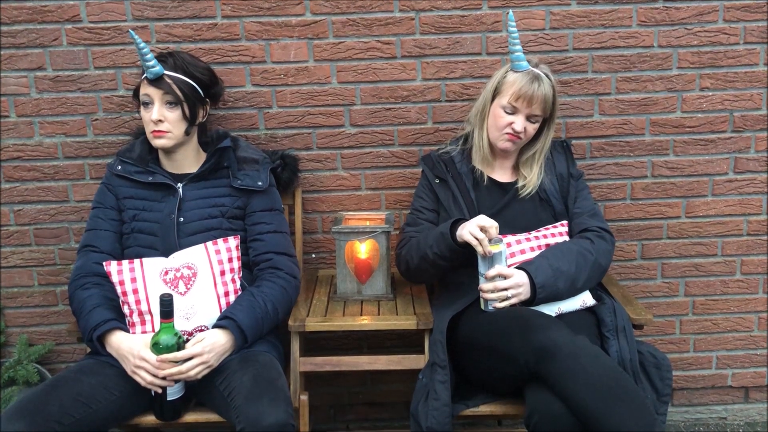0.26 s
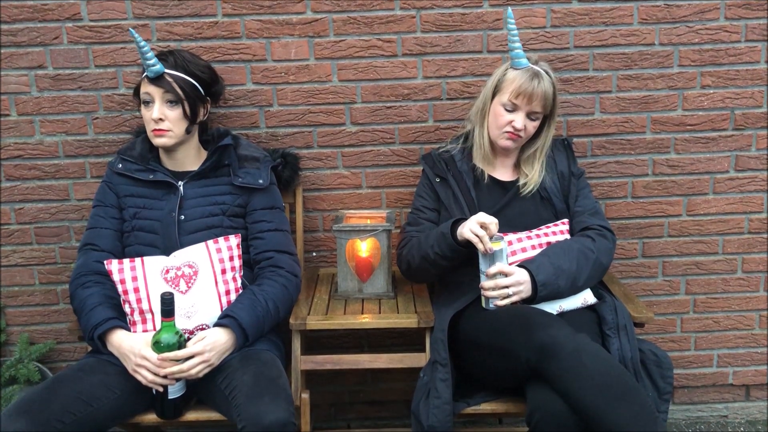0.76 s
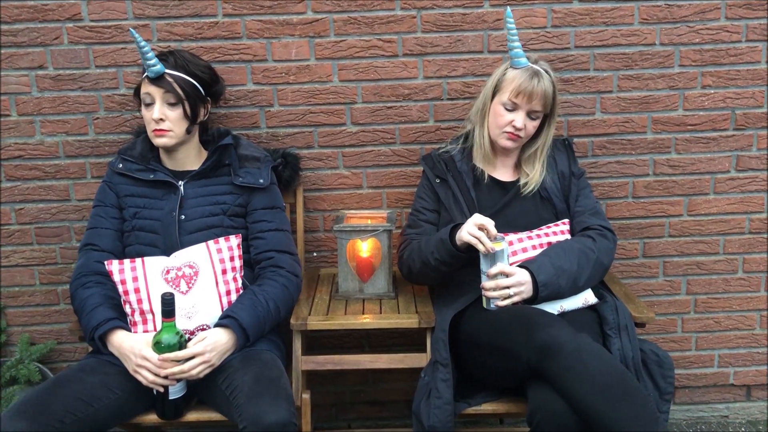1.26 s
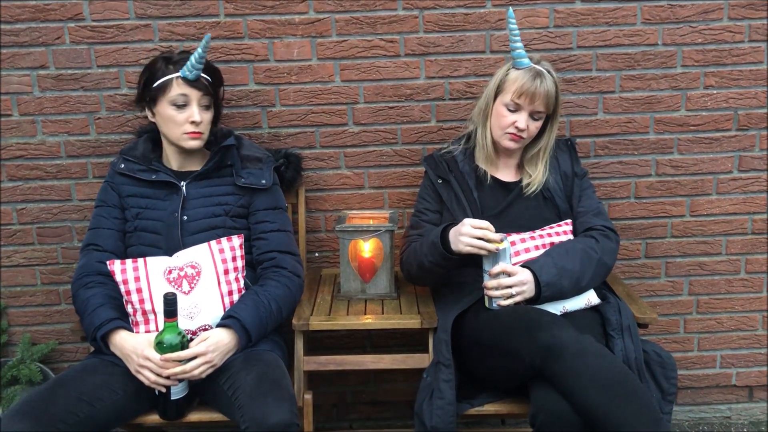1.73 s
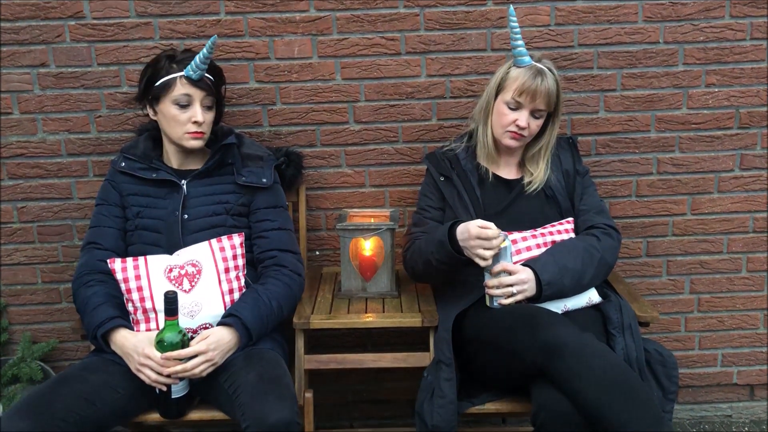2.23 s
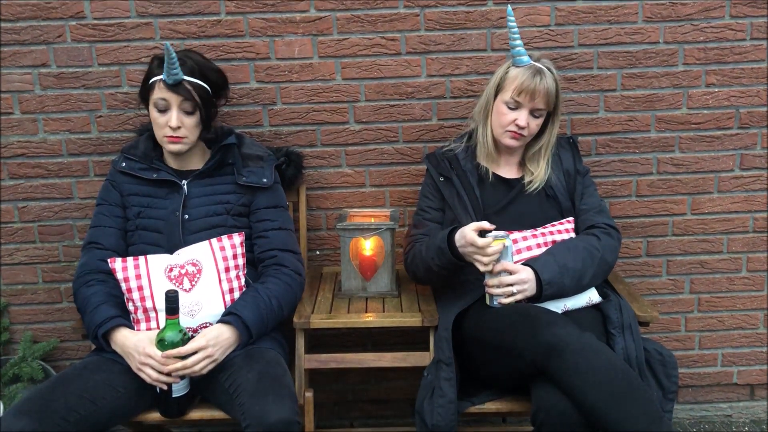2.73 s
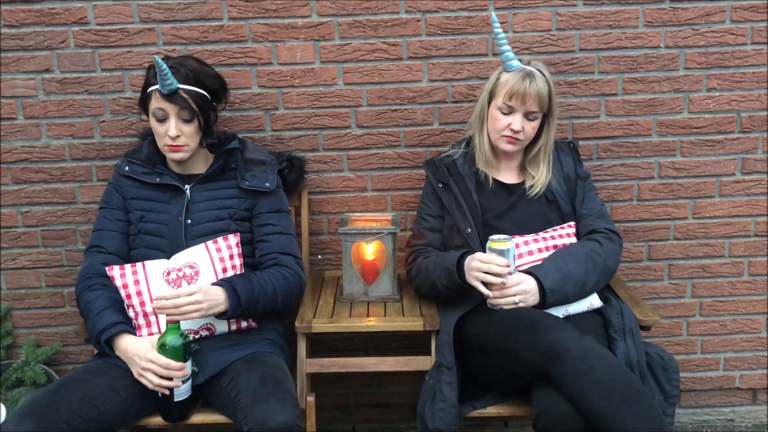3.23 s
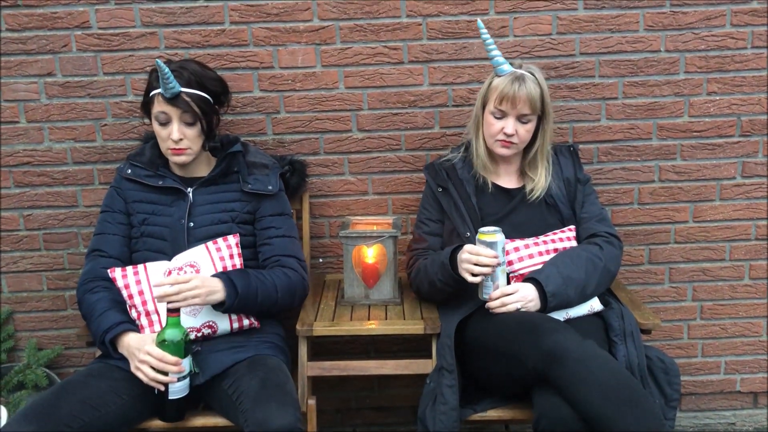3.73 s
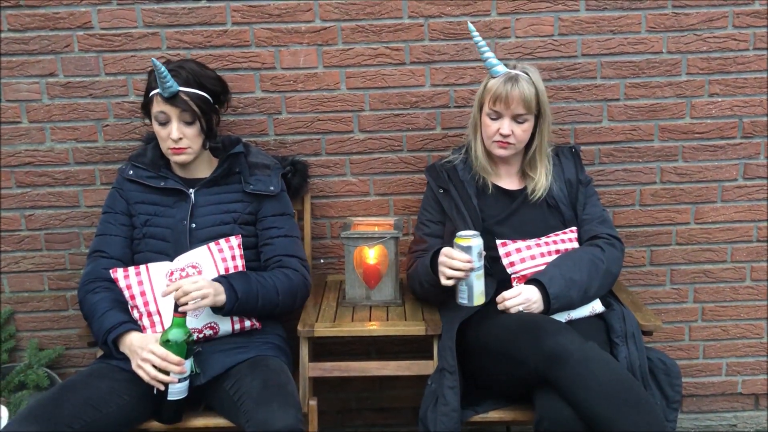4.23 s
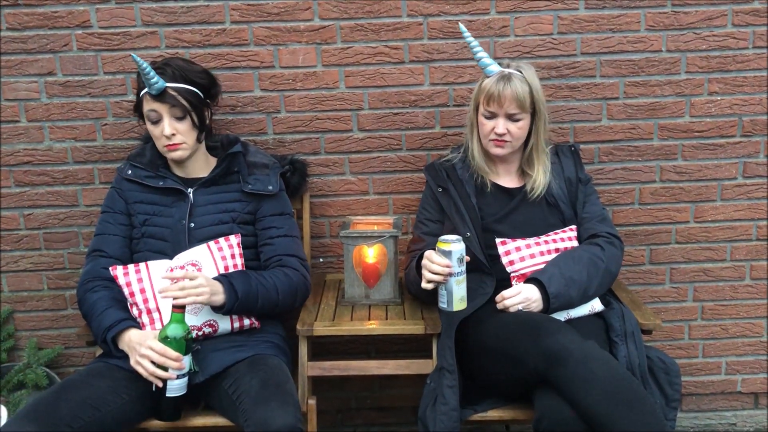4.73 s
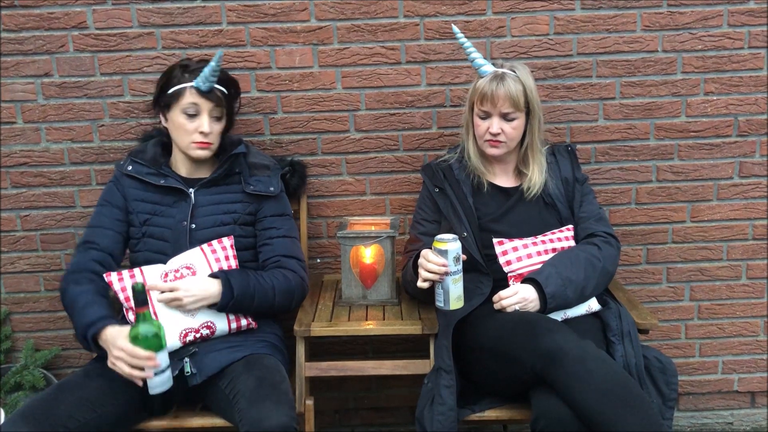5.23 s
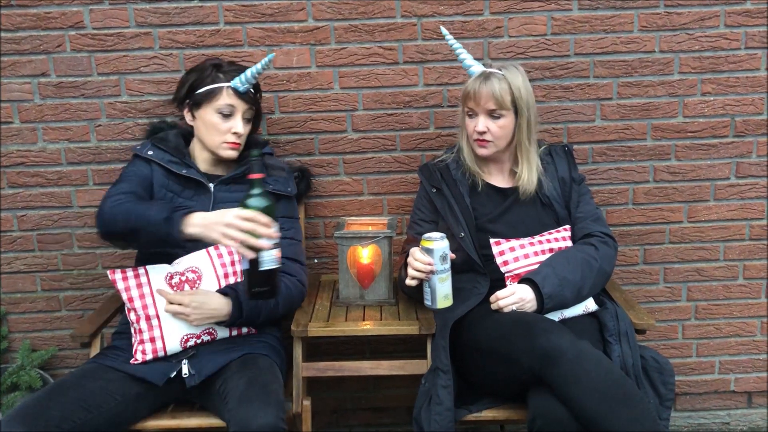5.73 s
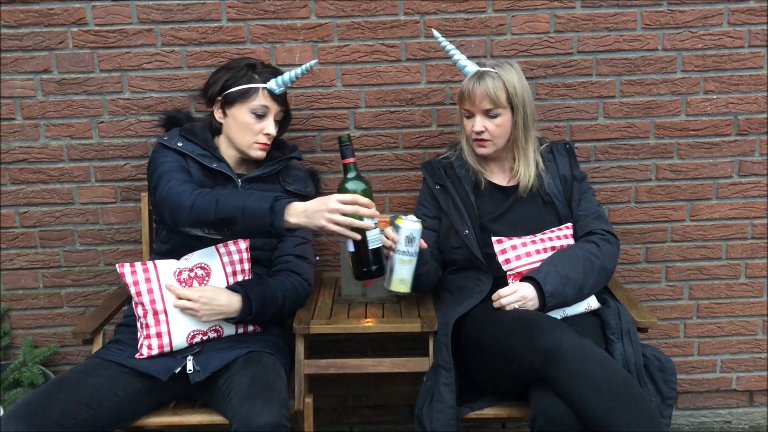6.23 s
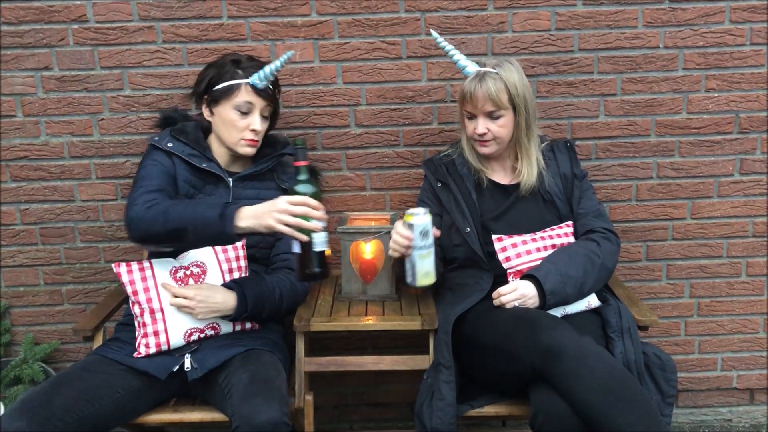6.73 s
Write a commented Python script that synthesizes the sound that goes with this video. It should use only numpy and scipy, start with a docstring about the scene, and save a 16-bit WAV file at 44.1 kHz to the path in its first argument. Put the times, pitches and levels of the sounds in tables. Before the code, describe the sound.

A quiet brick-walled yard, heard from a few metres, with faint low town rumble throughout and a short close wall echo. Almost at once, at 0.04 s, a can's seal cracks sharply; gas hisses and whistles, the lever snaps at 0.1, and the lid tears at 0.26-0.31 with a loud crisp burst of foamy spray. Hollow tinny tab ticks follow from 0.47 to 1.27, strongest around 1.0-1.1. Near-quiet, then a brief jacket swish at 2.06 and one thin tick at 2.41. Nylon rustles around 3.05-3.3. From 3.43 a metal screw cap scrapes and clicks, densest until 4.0, sparser until 4.84. At 4.88 a clear glass knock starts a soft low bottle hum. Small knocks and a short bubbling slosh come at 5.2-5.3. Jackets swish toward 6.3, a faint fingertip tap falls at 6.09, and the can touches the bottle in several dull clinks at 6.41-6.52; rustling closes near 7.

```python
"""Can and bottle opened in a yard

Brick-walled yard, one microphone a few metres off. A ring-pull can opens: noise whistles in the vented seal,
millisecond grains spray as foam, and short noise bursts ring the lid and tab through resonances.
Then a screw cap scrapes and ticks off a glass bottle, the neck is knocked and hums, bubbles glide in the drink,
the can touches the bottle. Padded jackets rustle as banded noise; a distant town rumbles as shaped noise."""
import sys
import numpy as np
from scipy import signal
from scipy.fft import rfft, irfft
from scipy.io import wavfile

SR = 44100
rng = np.random.default_rng(int(sys.argv[2]) if len(sys.argv) > 2 else 0)


def dump_mix(stems):
    """Bounce the given channels to the path in sys.argv[1] as a 16-bit WAV at rate SR."""
    frames = np.atleast_2d(stems).T  # one column per channel
    limited = np.clip(frames, -1, 1)  # hard clip at full scale
    pcm = np.round(limited * 32767).astype(np.int16)
    wavfile.write(sys.argv[1], SR, pcm)


def field_ratio(decibels):
    """Amplitude ratio for a level in dB (20 dB per decade); scalars and array-likes work."""
    return 10 ** (np.asarray(decibels, dtype=float) / 20)


N = 307818
T = np.arange(N) / SR

# MODES are resonances over a flat path: (frequency [Hz], width [Hz], level [dB])
# SWELLS are envelopes: (peak time [s], level [dB], rise [ms per 13 dB], fall [ms per 13 dB])
# STRIKES are contacts: (time [s], relative level [dB], low-end tilt [dB], added ring of the modes [dB])

# distant town, spectrum of the rumble: (frequency [Hz], relative level [dB])
TOWN_SPECTRUM = [(15, -45), (25, -13), (43, -17.5), (102, -3), (123, -11), (149, -1.5), (212, -4.5),
                 (285, -10.5), (344, -10.5), (659, -18.5), (796, -19), (1440, -29), (1740, -30),
                 (9070, -40), (16000, -47)]
# drones in the rumble: (centre [Hz], width [Hz], level [dB])
TOWN_DRONES = [(55, 6.6, -71), (103, 11, -72), (146.5, 10, -74.5), (238, 82, -66)]
TOWN_RUMBLE_DB = -63

# jacket movements: (peak time [s], nylon level [dB], rise [ms per 13 dB], fall [ms per 13 dB],
# padding level over nylon [dB])
JACKET_MOVES = [(2.059, -66, 11, 16, -5), (3.05, -67, 224, 190, -7), (3.33, -71.5, 42, 87, -6),
                (3.6, -81, 360, 800, 5.5), (5.1, -72, 170, 130, -7.5), (5.3, -79.5, 91, 400, 3),
                (5.9, -86, 400, 210, 12), (6.3, -69, 610, 200, 0), (6.98, -73.5, 280, 100, 5)]
NYLON_REST_DB, PADDING_REST_DB = -83.5, -88.5

# yard: tail energy against the direct sound, decay times of lows and treble, wall echo delay and levels
YARD_DB, YARD_T60_S, YARD_TOP_T60_S = -14.5, 0.22, 0.041
WALL_MS, CAN_WALL_DB, BOTTLE_WALL_DB = 3.3, -10.5, -14

# air in the bottle: onset, final pitch, level, decay time
NECK_S, NECK_HZ, NECK_DB, NECK_T60_S = 4.884, 146, -42, 0.9
# drink moving in the bottle: SWELLS columns, (peak time [s], relative level [dB], rise, fall [ms per 13 dB])
SLOP_SWELLS = [(5.21, -60, 12, 108), (5.289, -59, 45, 40.4)]
# low thuds under the knocks and touches: SWELLS columns
LOW_THUDS = [(4.883, -52.5, 2.3, 14), (5.207, -53, 1.5, 53), (6.42, -57.5, 2.7, 65)]
# screw cap: MODES columns
CAP_MODES = [(1970, 290, 6.5), (2580, 190, 6.5), (3120, 290, 5.5), (3395, 127, 15.5), (4200, 130, -27),
             (5320, 420, -10)]
# screw cap clicking round: STRIKES columns
CAP_TICKS = [(3.4317, -38.5, -10, -13), (3.445, -45, 17, -3), (3.4977, -49, -2, -4), (3.5066, -37.5, 3, 11),
             (3.5594, -35.5, 1.5, 8.5), (3.6606, -52, -8, -3), (3.7017, -45, 17, -16),
             (3.7594, -46, 13, -12), (3.864, -55, -20, 9), (3.894, -54, -10, 5), (3.928, -44, 12, 1),
             (3.9894, -48.5, 14, -10), (4.241, -60, -7, -8), (4.3615, -51.5, -11, 4), (4.4, -48, 0, -7),
             (4.4778, -50, 0, 3), (4.5116, -44.5, -4, -9), (4.6518, -52, 10, -6), (4.8434, -55, 11, -13)]
# scraping of the thread: SWELLS columns
THREAD_SWELLS = [(3.45, -56.5, 22, 35), (3.56, -57.5, 39, 30), (3.71, -55, 34, 71),
                 (3.945, -66.5, 44, 45.7), (4.25, -65.5, 11, 30), (4.37, -79, 58, 70),
                 (4.53, -71.5, 120, 22.14), (4.65, -80, 46, 25.2)]
# glass of the bottle: MODES columns
GLASS_MODES = [(620, 60, 6), (1130, 30, 10), (1335, 8, 27), (1550, 50, 11), (1900, 90, 8), (2500, 30, 14),
               (2622, 16, 21), (2960, 22, 15), (3397, 41, 13), (3747, 25, 14), (5400, 30, 13),
               (5534, 22, 22), (5631, 35, 13), (6780, 40, 17)]
# knocks on the glass: STRIKES columns
GLASS_KNOCKS = [(4.880, -29.5, 3, 1), (5.206, -47, 6.5, -21), (5.216, -44, 6.9, -2), (5.225, -44, 3.3, -12)]
# a fingertip shifting on the bottle: STRIKES columns
FINGER_TAP = [(6.089, -45, -11, 2.5)]
# can meeting bottle: STRIKES columns
CAN_TOUCHES = [(6.414, -37, 1.6, 3), (6.442, -45, 4.2, 2.1), (6.492, -47, 1.7, 5), (6.52, -48.5, 4.8, 6)]
# the can held in a fist: MODES columns
GRIPPED_MODES = [(1614, 250, 8.5), (1990, 250, 6), (3200, 500, 4), (6900, 700, 0)]

# shell and lid of the can: MODES columns
CAN_MODES = [(1750, 90, 5), (2150, 140, 12), (3850, 320, 11), (4450, 250, 4), (6900, 500, 6),
             (7900, 300, 2), (9900, 500, 5), (13000, 600, 2)]
# the lid while still under pressure: MODES columns
TIGHT_LID_MODES = [(3100, 45, 17), (4400, 45, 17), (5700, 50, 15), (6250, 50, 13), (6900, 60, 13),
                   (7600, 60, 13), (9500, 70, 14), (10000, 70, 14), (10750, 70, 11), (13500, 80, 10)]
# pushed-in flap of the lid, one mode: (frequency [Hz], width [Hz], level [dB])
FLAP_MODE = (1370, 40, 18.3)
# air above the drink, higher as the opening grows, muffled once the can is gripped:
# (time [s], frequency [Hz], width [Hz], level [dB])
HEADSPACE = [(.27, 700, 150, -15), (.28, 763.7, 195, 15), (0.398, 833.7, 200, 10), (.47, 1077, 60.2, 25),
             (1.1, 1100, 69.7, 25), (2.4, 1204, 300, 1)]
OPEN_S = 0.45  # from here the flap rings too
# puffs through the split seal: SWELLS columns
GAS_PUFFS = [(.068, -31.5, 16, 40), (.1, -27.5, 45, 11), (.15, -62.5, 20, 60), (.2635, -30.5, .6, 39),
             (.3, -33.5, 18, 14)]
# whistles of the slit: MODES columns
VENT_MODES = [(6600, 350, 3), (8800, 320, 8.5), (9700, 390, 4), (9730, 51, 4.5), (9300, 230, 5),
              (13450, 230, 13)]
VENT_SHUT_S = 0.118
# spray under the sealed lid: SWELLS columns
FOAM_SHUT = [(.108, -41.5, 30, 20), (.16, -64, 20, 60)]
# foam through the torn lid: SWELLS columns
FOAM_TORN = [(0.2622, -29, 0.68, 9.5), (0.295, -26.5, 12, 20), (0.329, -41, 25, 69)]
# the seal cracking: STRIKES columns
SEAL_CRACK = [(0.0435, -12.5, -20.5, 12.)]
# the lever snapping down on the lid: STRIKES columns
TAB_PRESS = [(0.1002, -10.5, -8, 13)]
# the score line of the lid tearing: STRIKES columns
LID_TEARS = [(0.2613, -13.5, 1, -2), (0.2813, -7, 1.5, 2), (0.2838, -8.5, -6.5, -4.5),
             (0.2924, -26.5, -12.5, -8), (0.2994, -14, -12, 13), (0.3064, -14, -16.5, -8)]
# the tab ticking on the lid: STRIKES columns
TAB_TICKS = [(0.4688, -28.5, 2, 3), (0.5062, -39, 6, -1), (0.5302, -41, 4, -12), (0.5424, -38, 12, -1),
             (0.5716, -46.5, 0, -8), (0.6504, -42.5, -2, 2), (0.6744, -46.5, 14, 3), (0.7447, -49.5, 13, 6),
             (0.8006, -49.5, 2, -13), (0.8097, -44, -3, 11), (0.8255, -48.5, -15, 7), (0.851, -50, -4, -7),
             (0.8779, -45.5, -8, 2), (0.8974, -38.5, -5, -9), (0.9672, -32, -8, -6), (1.0031, -30.5, -1, 3),
             (1.0364, -38.5, 3, 4), (1.0465, -28.5, -17, -2), (1.0984, -28.5, -11, 15),
             (1.271, -45.5, 8.5, -19), (2.4089, -30, 7.5, -40)]
# loose tab shivering on the lid: SWELLS columns
TAB_RATTLE = [(.47, -52.5, 2.8, 14), (.5, -55.5, 52, 70), (.652, -62.5, 2.5, 22), (.802, -78, 2.8, 49),
              (.9, -81, 30, 15), (1.005, -62, 2.7, 28), (1.05, -60, 7.1, 28), (1.098, -47, 2.2, 11),
              (2.412, -56.5, 2.2, 29)]

# contacts: (decay [ms], treble tilt [dB], scatter of the modes [dB],
# treble lost for each dB softer than FIRM_DB [dB])
FIRM_DB = -30
TEAR, TICK = (0.1, -7.5, 3.5, 0.1), (1.9, 2.2, 7.5, 0.14)
SEAL, PRESS = (0.9, -1, 1, 0.01), (1.75, -30, 4.5, 0.01)
RATCHET, KNOCK = (2.2, -3, 4, 0.26), (4.5, -1.5, 2, 0.8)
TOUCH, TAP = (16, -3, 7.5, 0.4), (0.5, -40, 2, 0.01)

OVERLOAD = 0.9  # microphone ceiling, full scale = 1


def level(x, db=0):
    """Set the rms."""
    return x * field_ratio(db) / np.sqrt(np.mean(x ** 2))


def ringing(hz, modes):
    """Response of a body: a flat path plus its resonances."""
    return 1 + sum(field_ratio(db) / (1 + 2j * (hz - f) / w) for f, w, db in modes)


def shaped(x, response):
    """Filter x by a function of frequency; rms 1."""
    hz = np.fft.rfftfreq(len(x), 1 / SR)
    return level(irfft(rfft(x) * response(hz), len(x)))


def band(x, lo_hz, hi_hz):
    """Band-pass; rms 1."""
    sos = signal.butter(3, [lo_hz, min(hi_hz, SR / 2.1)], "band", fs=SR, output="sos")
    return level(signal.sosfilt(sos, x))


def gain(swells):
    """Sum of swells that rise and fall evenly in dB around their peaks."""
    total = np.zeros(N)
    for s, db, rise_ms, fall_ms in swells:
        away = np.where(T < s, (s - T) / max(rise_ms, 0.1), (T - s) / max(fall_ms, 0.1))
        total += field_ratio(db - 12970.0 * away)
    return total


def grit(spread_db, share):
    """Noise in millisecond grains, a share of them louder."""
    size = SR // 1000
    count = N // size + 1
    boost_db = spread_db * np.minimum(rng.exponential(size=count), 3)
    boost_db = boost_db * (rng.random(count) < share)
    return rng.standard_normal(N) * np.repeat(field_ratio(boost_db), size)[:N]


def strikes(events, modes, contact):
    """Each contact is a dying burst plus a blow that rings the body; every blow finds the modes differently."""
    size, lead = 16384, 64  # samples: length of a hit, room before it
    decay_ms, edge_db, scatter_db, dulling = contact
    out = np.zeros(N + size)
    t = (np.arange(size) - lead) / SR
    hz = np.fft.rfftfreq(size, 1 / SR)
    corners_hz = [120, 350, 1000, 4200, 8500, 16000]
    for s, strength_db, low_db, ring_db in events:
        fade = np.where(t > 0, t / decay_ms, -t / max(decay_ms / 4, 0.25))
        burst = rng.standard_normal(size) * np.exp(-1000 * fade)
        blow = rfft(burst * np.exp(-1000 * np.abs(t) / decay_ms))
        blow = blow / np.abs(blow)  # even at all pitches, spread over the contact
        struck = np.array(modes(s), float)
        struck[:, 2] += ring_db + scatter_db * rng.standard_normal(len(struck))
        struck[:, 0] *= 1 + 0.003 * scatter_db * rng.standard_normal(len(struck))
        # softer contacts are duller
        high_db = edge_db - dulling * max(FIRM_DB - strength_db, 0)
        tilt_db = [low_db - 64, low_db - 35.5, low_db - 0.5, 0, high_db + 4, high_db - 2.0]
        tilt = field_ratio(np.interp(np.log(hz + 1), np.log(corners_hz), tilt_db))
        creak = rfft(burst) / np.linalg.norm(burst)
        rung = blow * (ringing(hz, struck) - 0.7)
        hit = irfft(tilt * (creak + rung))
        hit = hit * np.clip(3 - t / 0.08, 0, 1)  # rung out after a quarter second
        start = int((s + 0.00065) * SR) - lead
        out[start:start + size] += hit * field_ratio(strength_db + 12.0) / np.linalg.norm(hit)
    return out[:N]


def town():
    """Distant broad rumble with a few wavering drones, each a narrow band of noise."""
    hz, db = np.transpose(TOWN_SPECTRUM)
    rumble = shaped(rng.standard_normal(N), lambda f: field_ratio(np.interp(np.log(f + 1), np.log(hz), db)))
    out = field_ratio(TOWN_RUMBLE_DB) * rumble
    for centre, width, drone_db in TOWN_DRONES:
        drone = shaped(rng.standard_normal(N), lambda f: 1 / (1 + ((f - centre) / width * 2) ** 2))
        out += field_ratio(drone_db) * drone
    return out


def jackets():
    """Smooth nylon swish with a duller part from the padding."""
    nylon_gain = field_ratio(NYLON_REST_DB) + gain([row[:4] for row in JACKET_MOVES])
    padding_moves = [(s, db + low, rise, fall) for s, db, rise, fall, low in JACKET_MOVES]
    padding_gain = field_ratio(PADDING_REST_DB) + gain(padding_moves)
    nylon = band(grit(0.99, 0.25), 2200, 14000)
    padding = band(rng.standard_normal(N), 270, 2200)
    return nylon * nylon_gain + padding * padding_gain


def yard(x, wall_db):
    """One close echo off the wall behind, then a short diffuse tail that loses its treble first."""
    t = np.arange(SR // 2) / SR
    noise = rng.standard_normal(len(t))
    low = signal.sosfilt(signal.butter(1, 5000, fs=SR, output="sos"), noise)
    tail = low * field_ratio(-60 * t / YARD_T60_S) + (noise - low) * field_ratio(-60 * t / YARD_TOP_T60_S)
    tail = tail * (1 - np.exp(-t / 0.012))
    response = field_ratio(YARD_DB) * tail / np.sqrt(np.sum(tail ** 2))
    response[0] += 1  # direct sound
    response[int(WALL_MS * SR / 1000)] += field_ratio(wall_db)
    return signal.fftconvolve(x, response)[:N]


def neck():
    """The air in the opened bottle hums; the tone rises as the cap clears the mouth."""
    t = np.clip(T - NECK_S, 0, None)
    phase = 2 * np.pi * NECK_HZ * (t - 0.15 * 0.028 * (1 - np.exp(-t / 0.013)))
    return field_ratio(NECK_DB - 60 * t / NECK_T60_S) * (1 - np.exp(-t / 0.01)) * np.sin(phase)


def slop(count=120):
    """Bubbles that glide upward, higher-pitched ones later, over splash noise."""
    start, end = SLOP_SWELLS[0][0] - 0.03, SLOP_SWELLS[-1][0] + 0.12
    bubbles, t = np.zeros(N), np.arange(2048) / SR
    for when, pitch, softness in rng.random((count, 3)):
        hz = 450 * np.exp(1.21 * when + 1.3 * pitch)
        tone = np.sin(2 * np.pi * hz * t * (1 + 8 * t))
        k = int((start + when * (end - start)) * SR)
        bubbles[k:k + len(t)] += field_ratio(-12 * softness) * np.exp(-t * hz / 6) * tone
    bubbles = bubbles / np.std(bubbles[int(start * SR):int(end * SR)])
    splash = band(grit(3.3, 0.31), 360, 5000)
    return (bubbles + 0.61 * splash) * gain(SLOP_SWELLS) * field_ratio(1)


def cap():
    """The thread scrapes as gritty noise and the cap clicks, both ringing the cap."""
    scrape = band(grit(4.0, 0.2), 490, 7900)
    thread = shaped(scrape, lambda hz: ringing(hz, CAP_MODES)) * gain(THREAD_SWELLS)
    return thread + strikes(CAP_TICKS, lambda s: CAP_MODES, RATCHET)


def glass():
    """Knocks and a fingertip ring the glass modes."""
    knocks = strikes(GLASS_KNOCKS, lambda s: GLASS_MODES, KNOCK)
    return knocks + strikes(FINGER_TAP, lambda s: GLASS_MODES, TAP)


def low_thuds():
    """Low thuds under the knocks and touches: swells of low-band noise."""
    return band(rng.standard_normal(N), 125, 800) * gain(LOW_THUDS)


def can_on_bottle():
    """The can touches the bottle; the fist round it leaves only broad, damped modes."""
    return strikes(CAN_TOUCHES, lambda s: GRIPPED_MODES, TOUCH)


def can_modes(s):
    """Shell and lid modes plus the air space as it is at time s; the flap joins once the can is open."""
    when, *columns = np.transpose(HEADSPACE)
    air = [np.interp(s, when, c) for c in columns]
    flap = [FLAP_MODE] if s > OPEN_S else []
    return [*CAN_MODES, air, *flap]


def gas():
    """Escaping hiss whistles in the slit until it shuts, then hisses plainly."""
    jet = band(grit(1.2, 0.076), 4600, 17000)
    whistle = shaped(jet, lambda hz: ringing(hz, VENT_MODES))
    hiss = np.where(T < VENT_SHUT_S, whistle, jet)
    return hiss * gain(GAS_PUFFS) * (T > SEAL_CRACK[0][0])


def foam():
    """Gritty spray rings the can, first under the sealed lid, then through the torn one."""
    spray = band(grit(2.1, 0.54), 670, 9200)
    out = np.zeros(N)
    for swells in (FOAM_SHUT, FOAM_TORN):
        modes = can_modes(swells[-1][0])
        out += shaped(spray, lambda hz: ringing(hz, modes) + 0.37) * gain(swells)
    return out


def lid():
    """The seal cracks on the tight lid, the lever snaps down, the score line tears."""
    crack = strikes(SEAL_CRACK, lambda s: TIGHT_LID_MODES, SEAL)
    press = strikes(TAB_PRESS, can_modes, PRESS)
    return crack + press + strikes(LID_TEARS, can_modes, TEAR)


def tab():
    """The tab ticks, and a shiver between ticks keeps the hollow can sounding."""
    quiver = band(grit(4.0, 0.15), 880, 8100)
    shiver = shaped(quiver, lambda hz: ringing(hz, can_modes(0.53)) - 0.6)
    return strikes(TAB_TICKS, can_modes, TICK) + shiver * gain(TAB_RATTLE)


def scene():
    """Near sounds in the yard over jackets and town; the bottle has a weaker wall echo than the can."""
    bottle = yard(cap() + glass() + low_thuds() + slop() + can_on_bottle(), BOTTLE_WALL_DB)
    can = yard(gas() + foam() + lid() + tab(), CAN_WALL_DB)
    return (town() + jackets() + neck() + bottle + can)[None]


def band_limit(x):
    """A steep low-pass at the top of the band."""
    return signal.sosfilt(signal.butter(12, 16820, fs=SR, output="sos"), x)


def record(dry):
    """The small microphone rounds the loudest peak, loses the deepest bass and the very top."""
    rounded = dry / (1 + (dry / OVERLOAD) ** 6) ** (1 / 6)
    bass_cut = signal.butter(2, 38, "high", fs=SR, output="sos")
    top_cut = signal.ellip(8, 0.2, 50, 16000, fs=SR, output="sos")
    mix = signal.sosfilt(np.r_[bass_cut, top_cut], rounded)
    return band_limit(mix)


dry = scene()
out = record(dry)
dump_mix(out)
```